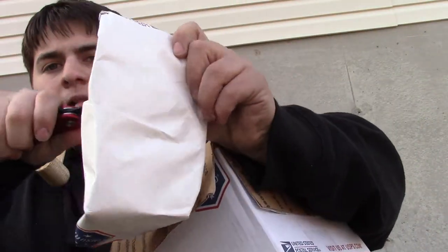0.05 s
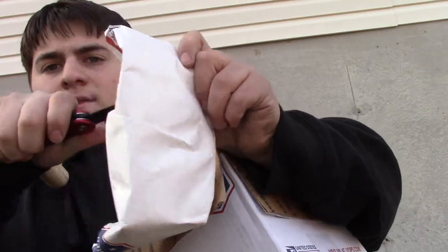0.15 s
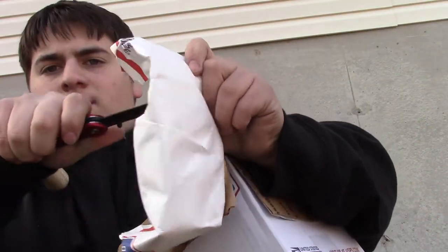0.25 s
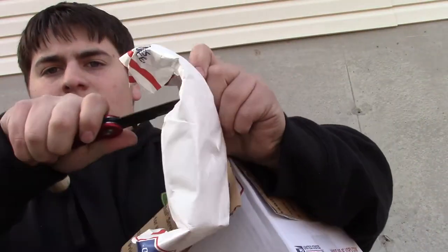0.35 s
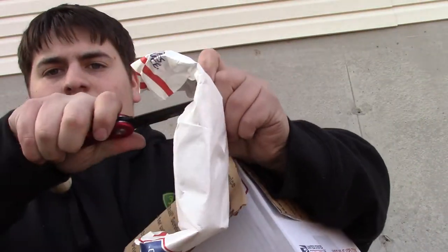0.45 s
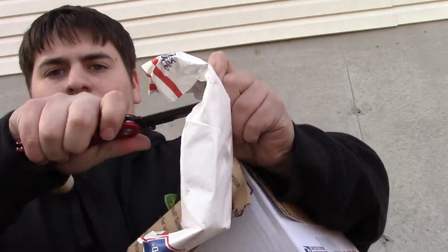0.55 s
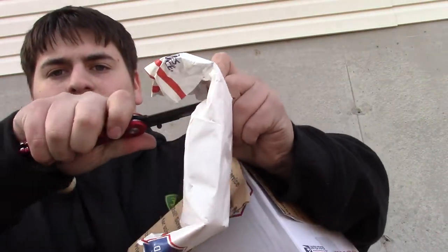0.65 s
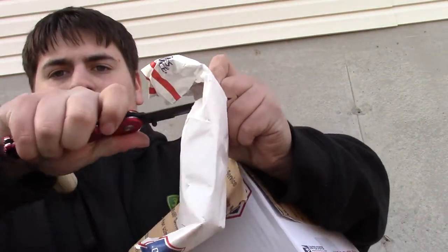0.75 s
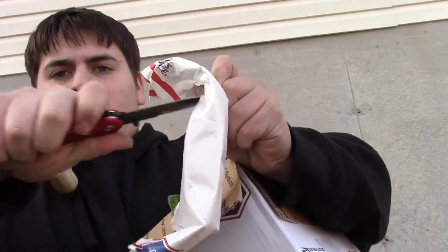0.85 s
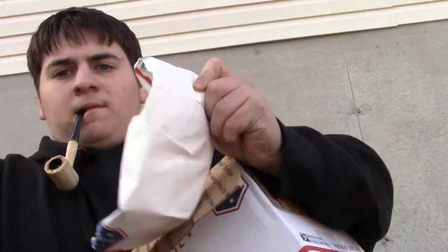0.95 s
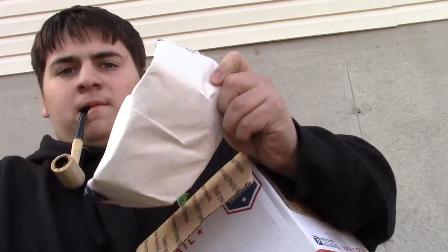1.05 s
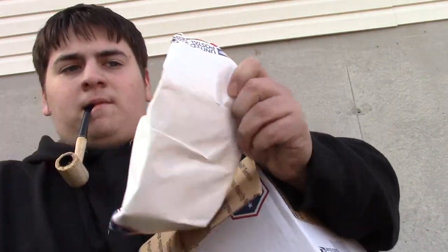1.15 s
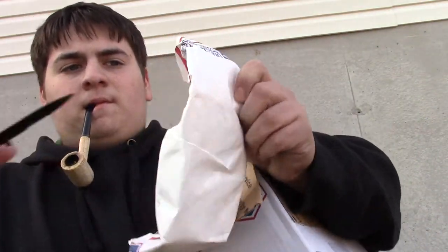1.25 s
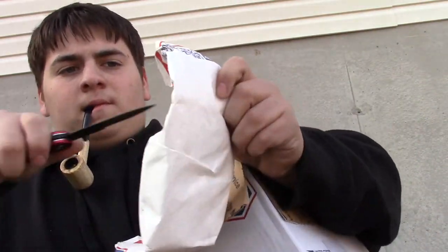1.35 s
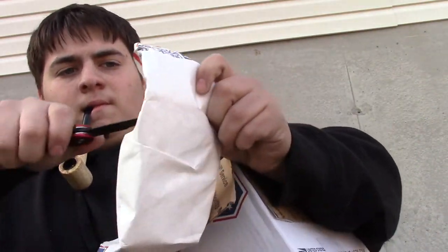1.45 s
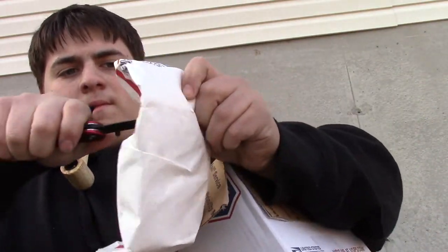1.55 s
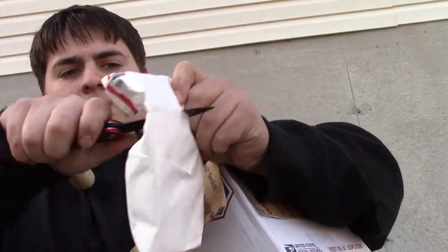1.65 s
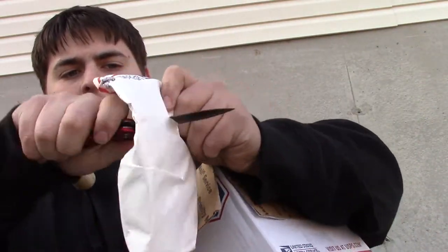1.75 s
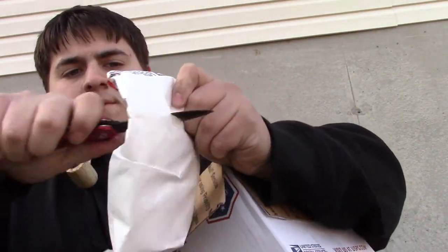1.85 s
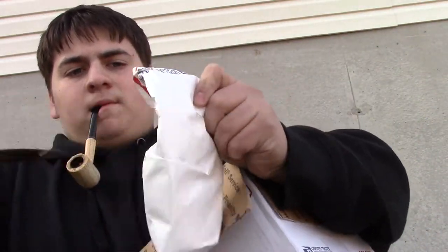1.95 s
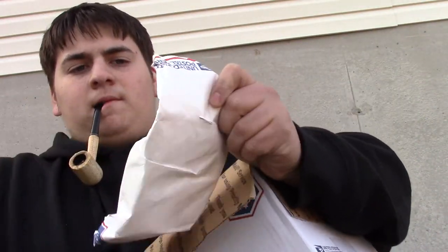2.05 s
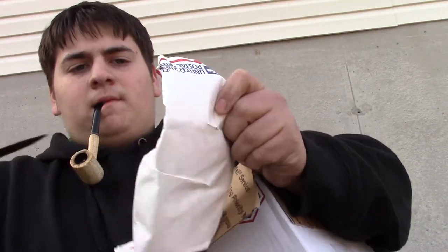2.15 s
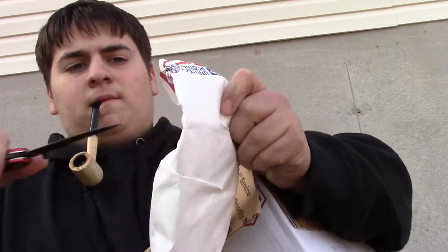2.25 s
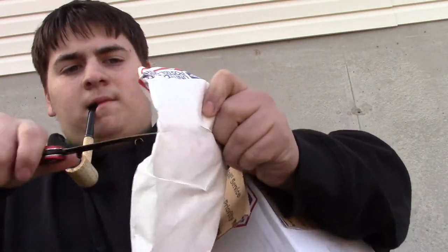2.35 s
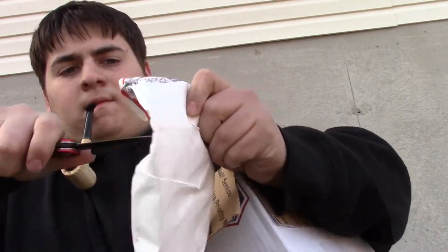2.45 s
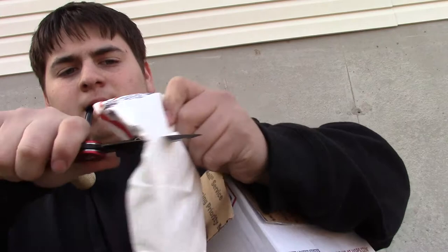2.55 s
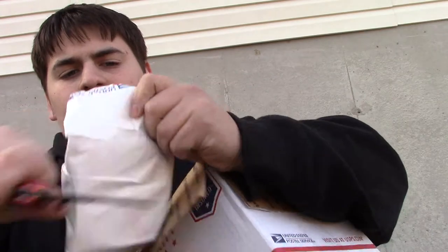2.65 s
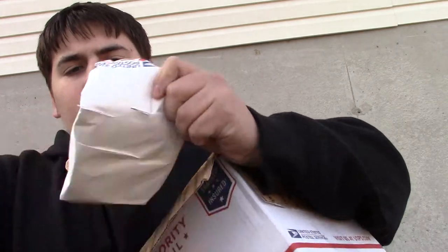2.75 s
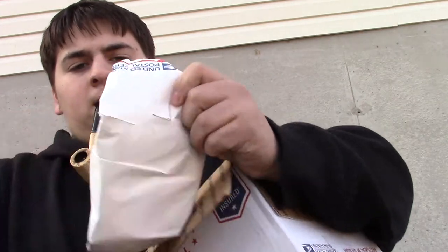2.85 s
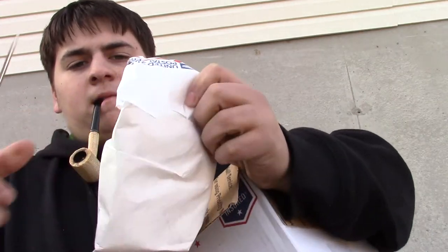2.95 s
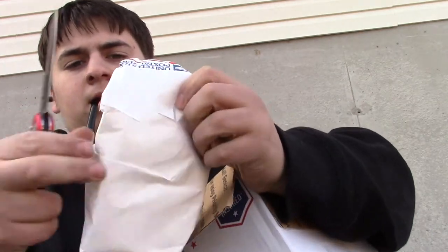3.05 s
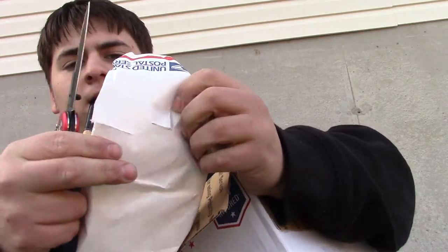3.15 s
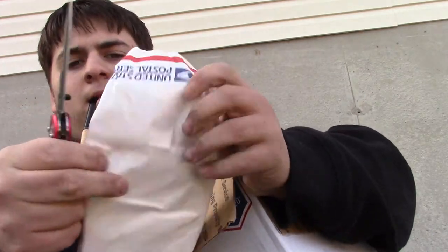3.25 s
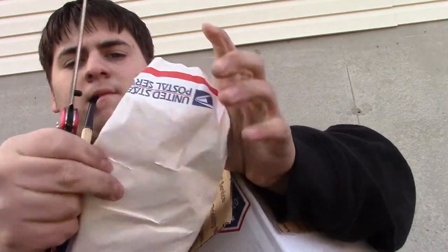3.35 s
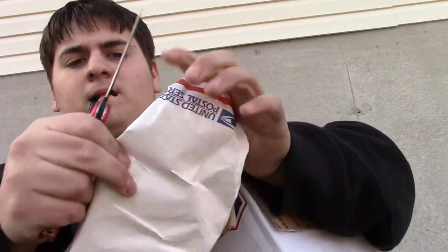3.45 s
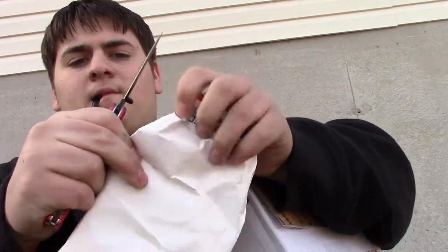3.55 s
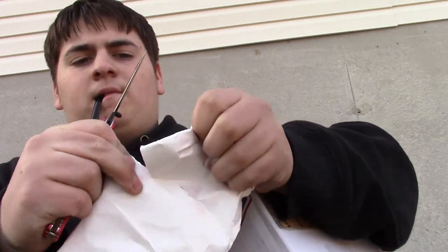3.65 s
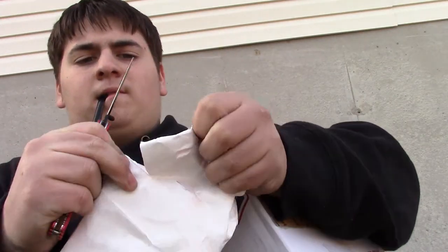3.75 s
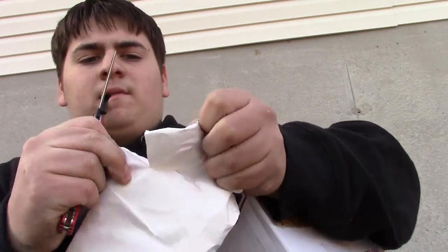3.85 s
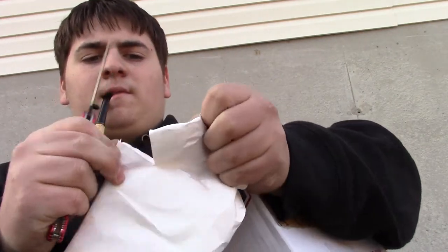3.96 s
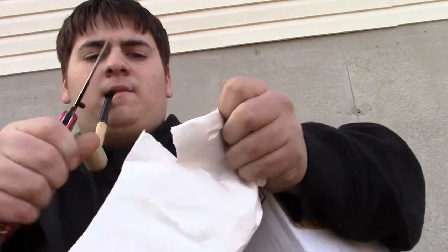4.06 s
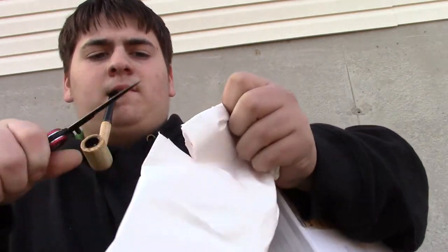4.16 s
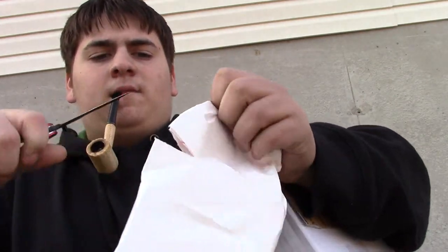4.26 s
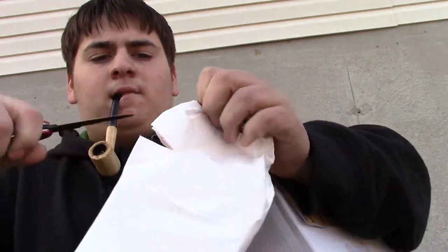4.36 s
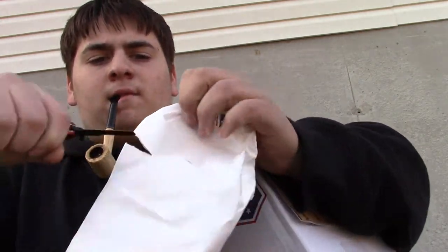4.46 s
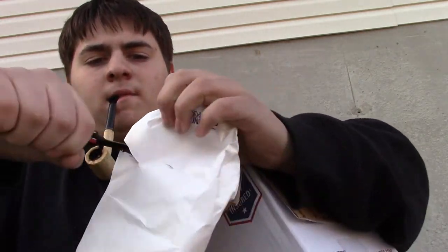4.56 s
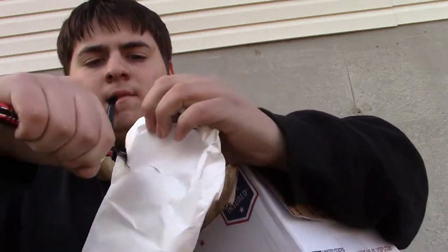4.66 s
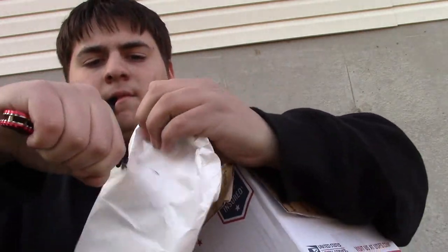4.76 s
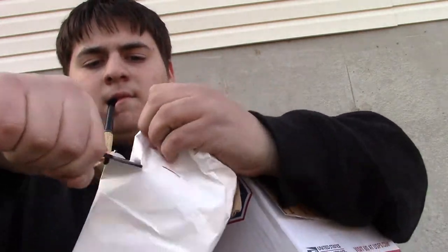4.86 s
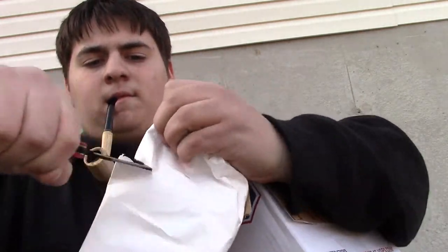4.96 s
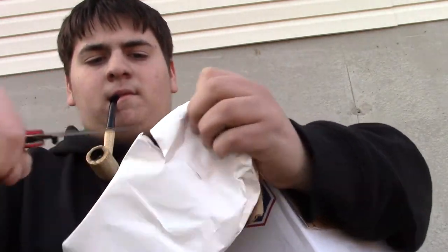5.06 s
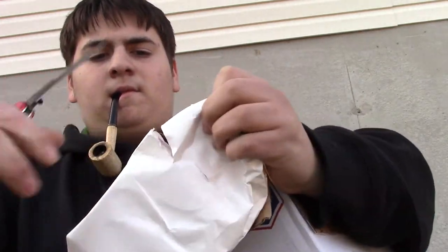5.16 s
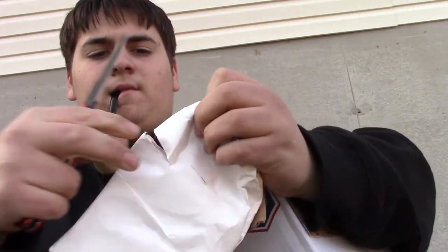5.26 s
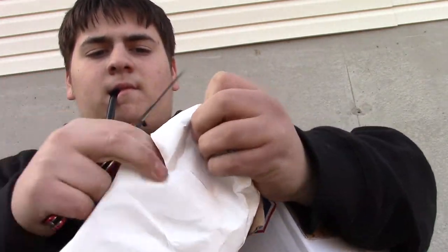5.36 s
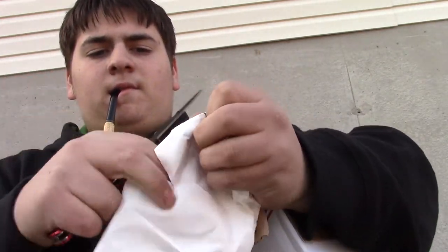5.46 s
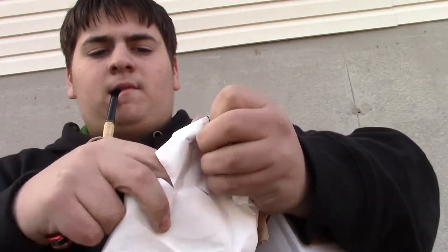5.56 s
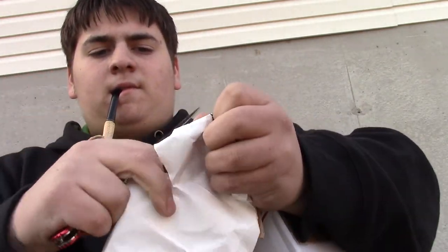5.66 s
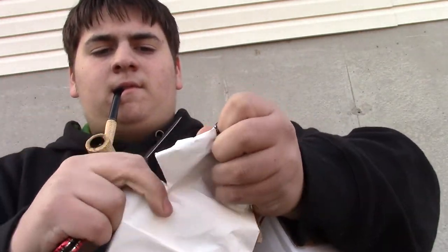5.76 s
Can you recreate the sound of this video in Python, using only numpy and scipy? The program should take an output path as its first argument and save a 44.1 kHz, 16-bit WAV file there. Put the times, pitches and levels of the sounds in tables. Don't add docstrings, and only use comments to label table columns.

```python
import sys
import numpy as np
from scipy import signal
from scipy.io import wavfile
from scipy.ndimage import uniform_filter1d

SR = 44100
rng = np.random.default_rng(int(sys.argv[2]) if len(sys.argv) > 2 else 0)


def bounce(signal):
    frames = np.transpose(np.atleast_2d(signal))
    limited = np.clip(frames, -1, 1)
    pcm = np.round(limited * 32767).astype(np.int16)
    wavfile.write(sys.argv[1], SR, pcm)


def how_loud(loudness_db):
    steps = np.asarray(loudness_db, float) / 20
    return 10 ** steps


N = 256662

# frequency in Hz, level in dB per Hz.
PAPER_SPECTRUM = [(88, -34.5), (150, -2.5), (172, -15), (205, -9), (401, 0.5), (845, 0.5), (1090, -0.5),
                  (2640, -1.5), (4200, -3), (5900, -4.5), (7480, 2.5), (12000, -4), (15200, -14),
                  (16400, -35)]


def rustle(cracks_per_s=6000, spread_db=3.0, clump_db=1.2, pops_db=-11.0, patchy_db=2.2, stir_db=4.0):
    flex_db, crackle_db, fizz_db, crumple = hands()
    crumple = np.clip(crumple, 0, 1)

    size = how_loud(spread_db * np.minimum(rng.exponential(1, N), 3.5)) * rng.choice([-1., 1.], N)
    cracks = evened(size * (rng.random(N) < cracks_per_s / SR))
    cracks = cracks + how_loud(pops_db) * pops(per_s=260, spread_db=2.5)
    slide = rng.standard_normal(N)
    drive = np.sqrt(1 - 0.66 * crumple) * slide + np.sqrt(crumple) * cracks

    drive *= how_loud(crumple * (clump_db * wander(73.0) + stir_db * stir()))
    drive /= np.sqrt(uniform_filter1d(drive ** 2, size=3500) + 1e-9)
    paper = signal.oaconvolve(drive, causal(PAPER_SPECTRUM))[:N]
    flex, crackle, fizz = split(mottled(paper, patchy_db))
    return how_loud(flex_db) * flex + how_loud(crackle_db) * crackle + how_loud(fizz_db) * fizz


# start in seconds, length in seconds, crackle level at the start in dB,
# growth to the end in dB, brightness (fizz re crackle) in dB. First, the blade slitting the sheet.
CUT_STROKES = [
    (0.876, 0.067, -41, 24.5, -1),
    (1.665, 0.11, -22.5, -0.5, 0),
    (1.857, 0.0637, -38, 12, -2),
    (1.928, 0.047, -26, -3.5, 1.5),
    (1.977, 0.016, -29, 16, -6),
    (3.112, 0.096, -38, 3, -3.5),
    (3.407, 0.152, -45, 18, 2),
    (4.706, 0.063, -40.5, 18, -5.5),
    (4.841, 0.29, -27, -6.5, -4),
]
RUB_STROKES = [(0, 0.1, -44, 3.5, -6.5), (.775, 0.107, -43.5, 0, 0.5), (0.963, 0.038, -29, -5.5, -1),
               (1.1, 0.11, -54.5, 13.5, -4.5), (1.188, .14, -41, 1, -0.5), (1.559, 0.097, -42, 2, -8),
               (2.004, 0.068, -36, -2.5, -2), (2.211, 0.07, -39, -3, -1), (2.6, 0.032, -17, 1, 4),
               (2.636, 0.027, -22, 3.5, -2.5), (2.923, 0.1, -36, -4, 0.5), (3.287, 0.095, -36, 2, -3),
               (4.074, 0.17, -42, -1, -25), (4.22, 0.13, -40.5, -10, -9.5), (4.37, 0.17, -58.5, 7, -3),
               (5.1, 0.08, -36, -11, -9)]
CRUSH_STROKES = [(.49, 0.072, -63.5, 16.5, 1.5), (1.04, 0.054, -47, -10, -25), (1.788, .07, -35, -5, -1.5),
                 (2.459, 0.062, -42, 11, -5.5), (2.678, 0.095, -23.5, -20, -9), (2.83, 0.11, -62, 16.5, -3),
                 (3.222, 0.07, -47, 5, -7), (3.559, 0.11, -22.5, -6, -7), (3.64, 0.055, -21.5, -2, -11.5),
                 (3.735, 0.11, -45, 17, -5.5), (3.867, 0.066, -29, -6, -10), (3.965, 0.084, -53, 16.5, -2),
                 (4.676, 0.0148, -45.5, 9.5, -4.5), (4.775, 0.019, -30, -4, -10), (4.812, 0.03, -37, 5, -8),
                 (5.349, 0.0407, -39.5, 10, -5.5), (5.393, 0.17, -30.5, -10, -7.5),
                 (5.512, 0.04, -42, 17.5, -3), (5.569, 0.088, -35.5, -4, -6), (5.649, 0.11, -28.5, -7, -8),
                 (5.758, 0.065, -28.5, -5, -9.5)]
PIERCE_STROKES = [
    (0.379, 0.056, -32, 11.5, -3),
    (.7, 0.016, -33, 12, 5),
    (.724, .02, -29.5, 5, -8),
    (2.552, 0.024, -35.5, 15, -11),
    (2.584, 0.009, -17.5, -3.5, -0.5),
]
# crumple share from 0 (slide) to 1, release in dB per second, flex re crackle in dB.
STROKE_KINDS = [
    (0.53, 1504, -7.5),
    (0.41, 445, -6),
    (0.98, 502, -4),
    (1, 517, -15),
]
# levels of flex, crackle and fizz in dB.
REST_LEVELS_DB = (-48.5, -71, -64)


def hands(attack_db_per_s=4996, flex_per_bright=-0.25, flex_late_db=4.5):
    t = np.arange(0, N / SR + .002, .001)
    power = how_loud(2 * np.array(REST_LEVELS_DB))[:, None] * np.ones(len(t))
    crumpled_power = .5 * how_loud(2 * REST_LEVELS_DB[1])
    kinds = (CUT_STROKES, RUB_STROKES, CRUSH_STROKES, PIERCE_STROKES)
    for strokes, (crumple, release_db_per_s, flex_db) in zip(kinds, STROKE_KINDS):
        start, length, db, growth_db, bright_db = np.transpose(strokes)[:, :, None]
        done = np.clip((t - start) / length, 0, 1)
        before_s = np.maximum(start - t, 0)
        after_s = np.maximum(t - start - length, 0)
        crackle_db = db + growth_db * done - attack_db_per_s * before_s - release_db_per_s * after_s
        sheet_db = flex_db + flex_per_bright * bright_db + flex_late_db * (done - .5)
        levels_db = np.array([crackle_db + sheet_db, crackle_db, crackle_db + bright_db])
        parts = how_loud(2 * levels_db).sum(1)
        power = power + parts
        crumpled_power = crumpled_power + crumple * parts[1]
    curves = (*10 * np.log10(power), crumpled_power / power[1])
    return [np.interp(np.arange(N) / SR, t, curve) for curve in curves]


def stir(after_s=.006):
    s, db = np.transpose(CREASES)[:2]
    kicks = np.zeros(N)
    kicks[np.round(s * SR).astype(int)] = how_loud(db)
    shake = signal.lfilter([1], [1, -np.exp(-1 / (after_s * SR))], kicks)
    usual = abs(uniform_filter1d(shake, size=2500)) + 1e-4
    return np.tanh(shake / usual - 1)


def pops(per_s, spread_db, cycles=1.4):
    size = how_loud(spread_db * np.minimum(rng.exponential(1, N), 4)) * (rng.random(N) < per_s / SR)
    pitches = np.geomspace(800, 9000, num=12)
    panel = rng.integers(0, len(pitches), N)
    t, out = np.arange(400) / SR, np.zeros(N)
    for k, hz in enumerate(pitches):
        tone = np.exp(-t * hz / cycles) * np.sin(2 * np.pi * hz * t)
        click = .5 * np.exp(-t / 0.00099) * rng.standard_normal(len(t))
        out += signal.oaconvolve(size * (panel == k), evened(tone + click))[:N]
    return evened(out)


def mottled(x, patchy_db):
    z = signal.stft(x, nperseg=256)[2]
    patches = uniform_filter1d(rng.standard_normal(z.shape), size=7, axis=0)
    patches = uniform_filter1d(patches, size=5, axis=1)
    return signal.istft(z * how_loud(patchy_db * evened(patches)), nperseg=256)[1][:N]


# time in
# seconds, peak level in dB, panel ring in Hz, fizz re peak in dB.
CREASE_SNAPS = [(0.0596, -23, 4130, -12), (0.1124, -18.5, 4310, 6.5), (0.1577, -17, 1400, -24),
                (0.19, -15, 2550, -5.5), (0.1958, -23, 1290, -20), (0.235, -19.5, 2700, -16),
                (0.265, -38, 730, -8), (0.3067, -40, 1160, 1), (0.3154, -26, 1210, -21),
                (0.3206, -22, 1720, -11), (0.3337, -10.5, 1110, -22), (0.3564, -10.5, 3550, -4),
                (0.3797, -11, 970, 0.5), (0.3976, -15, 3140, -0.5), (0.4187, -16, 1850, 11),
                (0.4229, -11, 3060, 7), (0.4418, -7.5, 3820, 7.5), (0.454, -19, 2630, 9),
                (0.4854, -32, 2110, -15), (0.5069, -40, 1250, 5), (0.5238, -34, 730, 5),
                (0.53, -32.5, 2410, 2), (0.5484, -33, 860, 5.5), (0.552, -34.5, 952, 0),
                (0.5878, -20, 2330, 9.5), (0.5937, -37, 860, 10), (0.6475, -23, 1210, -13),
                (0.6505, -28, 1640, -14), (0.662, -34, 5170, 7), (0.6707, -30.5, 5170, 5),
                (0.676, -33, 5210, 11.5), (0.6813, -28, 5250, 13), (0.722, -19, 4570, 4),
                (0.7256, -23, 4950, 1), (0.7581, -15, 1750, -10), (0.7811, -29, 1810, 14),
                (0.7955, -35, 1460, 12), (0.7988, -30, 1500, 9), (0.8336, -31, 4910, 5),
                (0.8431, -27.5, 4130, 14), (0.8894, -25, 3400, 6), (0.917, -18, 3750, 16),
                (0.9215, -8, 3830, -10), (0.9239, -6, 3400, 14), (0.9342, -16, 1640, 1),
                (0.9378, -7, 1420, 7), (0.9433, 0, 2370, -2),
                (0.9625, -10, 2070, -16), (0.9673, -22, 4310, -9), (0.9895, -23, 3620, 13.5),
                      (1.0293, -8.5, 746, -7.5), (1.0357, -17.5, 1590, -22), (1.046, -15, 1360, -17),
                      (1.071, -37.5, 730, 7), (1.185, -18.5, 730, -4.5), (1.263, -20, 1510, 3),
                      (1.3171, -18, 2780, -12), (1.4854, -46, 1030, 0), (1.6089, -18.5, 4220, -2),
                      (1.6448, -32, 1510, 3.5), (1.6477, -26, 4650, 6), (1.661, -9, 4300, -2),
                      (1.667, -10, 4820, -3), (1.6681, -2.5, 3720, -1.5), (1.6776, -15, 1890, -2),
                      (1.6843, -9.5, 4690, 8), (1.7559, -9, 730, -10), (1.8493, -22.5, 1590, 5),
                      (1.8723, -10.5, 3270, -17), (1.8883, -19, 3570, -4.5), (1.8935, -8, 2630, 2.5),
                      (1.9212, -18, 2450, 9), (1.9892, -6.5, 900, 2.5), (1.9945, -14, 2800, -3),
                      (1.9976, -2, 3570, -1), (2.0134, -13.5, 2150, 3), (2.0884, -20.5, 730, 4.5),
                      (2.092, -18, 2760, -9), (2.1108, -23, 2670, -22), (2.1246, -38, 820, 1),
                      (2.1315, -26, 820, -15), (2.1621, -45, 730, 0), (2.1987, -33, 1120, -1),
                      (2.214, -40, 1640, 13), (2.233, -28, 730, 3), (2.4188, -50, 1080, -1),
                      (2.4574, -15.5, 820, -16), (2.46, -27, 4820, -4), (2.465, -34.5, 5250, 10),
                      (2.4952, -14, 1720, -13.5), (2.5164, -17, 2540, 3.5), (2.542, -14, 1890, -2),
                      (2.5652, -19, 2840, 1), (2.5835, -11, 3960, -5),
                (2.5868, -11, 3750, -3), (2.65, -4, 4480, -3), (2.656, 1, 1850, -4),
                   (2.6638, -2.5, 900, 4), (2.6715, -2, 3920, -3), (2.6839, -9.5, 2500, 7),
                   (2.6947, -2.5, 2730, -6), (2.7123, -15, 780, -5), (2.716, -15, 870, -0.5),
                   (2.7726, -22, 1450, -14), (2.7844, -36, 730, -10), (2.8381, -43, 730, 1),
                   (2.8895, -29, 2370, -9), (2.9286, -12, 784, -13), (3.11, -21.5, 2200, -14),
                   (3.1746, -20.5, 2280, -10), (3.2164, -17.5, 1770, -2.5), (3.2407, -22, 2070, -22),
                   (3.2832, -30, 2020, -10.5), (3.3236, -16.5, 2670, 2), (3.332, -26, 2840, -0.5),
                   (3.334, -24, 2580, -4), (3.3626, -27, 2410, 14), (3.37, -20, 2410, -9),
                   (3.3788, -8, 4740, 2), (3.3824, -14, 2890, 7), (3.3886, -27, 4820, 6),
                   (3.4048, -8, 1660, 1.5), (3.5227, -18, 3100, -6), (3.541, -10.5, 1030, -6),
                   (3.5589, -13, 1590, 3), (3.5707, -2, 830, -7.5), (3.5737, -1.5, 1660, -15),
                   (3.59, -9, 2930, 4), (3.6002, -4.5, 4950, -11), (3.611, -6, 2580, -11),
                   (3.6226, -9, 2710, 3), (3.6254, -11, 2710, -6), (3.6285, -9, 2630, -11),
                   (3.6333, -9, 3920, -2), (3.641, -15, 3570, -3), (3.6446, -3.5, 3320, 0.5),
                   (3.6786, -3, 2450, -5), (3.6807, -4.5, 3360, -6), (3.6875, -9.5, 1340, -18),
                   (3.69, -8, 3660, -8), (3.695, -7, 2110, -7),
                (3.7125, -2, 2090, -9), (3.722, -11.5, 1550, -13), (3.7415, -25, 820, -8),
                     (3.752, -28, 3660, 0), (3.7556, -7.5, 3010, -24), (3.759, -2.5, 2970, -1),
                     (3.776, -19, 1160, 1), (3.7885, -21, 2800, -2), (3.7976, -6.5, 780, 1),
                     (3.8092, -26, 780, 5), (3.8227, -8.5, 820, 5), (3.8316, -10, 1550, -22.5),
                     (3.851, -12, 1120, 5), (3.86, -4, 2800, 2.5), (3.8683, -12, 4910, -2),
                     (3.8735, -5.5, 1150, -11), (3.8961, -6.5, 875, 9.5), (3.906, -17, 730, 4),
                     (3.9119, -29, 990, 9), (3.9323, -19, 4950, 7), (3.9483, -20, 730, -7),
                     (3.9773, -21, 730, -14), (3.9972, -15, 3880, -10), (4.012, -21, 1460, -9.5),
                     (4.0371, -22, 3450, -7), (4.0433, -23, 730, -5.5), (4.0922, -26, 2200, -8),
                     (4.1139, -16.5, 3620, 9), (4.1616, -22, 950, -14.5), (4.258, -18, 1720, -8),
                     (4.288, -27, 1510, -4), (4.2952, -22.5, 1120, -4), (4.3135, -25, 1810, -6.5),
                     (4.3831, -33, 730, -2), (4.3954, -31.5, 1640, 2), (4.43, -39, 730, 4),
                     (4.6564, -49, 730, 9), (4.6753, -35, 730, 0), (4.6878, -23.5, 2710, 2),
                     (4.6943, -25, 1420, -6), (4.702, -20, 4180, -7), (4.7216, -26, 820, 0),
                     (4.744, -16, 2150, -7), (4.7546, -11, 1890, 7.5), (4.7796, -7, 1370, -11),
                     (4.7969, -14, 1220, -13.5), (4.8203, -16, 1290, -11.5),
                (4.8418, -10, 820, 5.5), (4.8538, -5, 2240, -5), (4.8644, -3, 2760, -5),
                   (4.8687, -12, 5000, 4), (4.875, -16, 3530, -2), (4.88, -14, 4260, -1),
                   (4.918, -5, 1750, -16.5), (4.9215, -5, 2580, -0.5), (4.9516, -11, 2580, 0),
                   (4.9663, -10, 2760, 8), (4.977, -20, 3700, 6), (5.059, -12, 2630, 4.5),
                   (5.0676, -19, 730, 6), (5.0777, -9, 1460, -2), (5.103, -21, 2020, 2),
                   (5.1185, -32, 1980, -1), (5.1722, -13.5, 2670, -6), (5.239, -31.5, 730, -2),
                   (5.2551, -20.5, 2500, -12), (5.3288, -12.5, 1850, -13), (5.3497, -28, 1750, -1.5),
                   (5.3601, -16, 1810, -1), (5.365, -19.5, 1940, -4.5), (5.3846, -24, 950, -10),
                   (5.3964, -20, 2500, 4), (5.402, -20, 1250, -9), (5.4191, -13.5, 1980, -11),
                   (5.4486, -11, 730, -10), (5.4939, -22, 1420, -10), (5.5163, -14.5, 1770, -4),
                   (5.5358, -4.5, 3750, 2.5), (5.5501, -10.5, 1890, -9), (5.554, -1.5, 3880, 1),
                   (5.5665, -14, 1890, -11), (5.6026, -19, 955, -7), (5.614, -11.5, 2450, -1),
                   (5.6366, -12, 3660, 0), (5.6522, -8.5, 786, -10), (5.6656, -17, 2540, -15),
                   (5.6944, -14, 2150, -11), (5.7073, -9.5, 3160, -8), (5.7458, -18, 3060, -2),
                   (5.7616, -15.5, 1680, 5), (5.7651, -13, 1810, -3), (5.781, -9, 2070, 1),
                   (5.7934, -14, 2970, -3), (5.8063, -20, 730, 4)]
CREASES = CREASE_SNAPS


def snaps(ring_db=-12.5, ring_per_db=2.0, trim_db=(-2.5, -1.5, -1.5)):
    flip_s, settle_db, settle_t60_s, jolt_db = .0016, -22, .03, 7
    s, db, hz, fizz_db = np.transpose(CREASES)
    flex_db = -12.5 - 8.5 * np.log2(hz / 1460)
    out, t = np.zeros(N), np.arange(900) / SR

    noise = rng.standard_normal((len(s), len(t)))
    noise[:, 4] = how_loud(jolt_db) * np.sign(noise[:, 4])
    flip = np.exp(-(t / flip_s) ** 2)
    settling = how_loud(settle_db - 60 * t / settle_t60_s)
    bursts = noise * (flip + settling)
    paper = signal.oaconvolve(bursts, causal(PAPER_SPECTRUM)[None], axes=1)[:, :len(t)]

    flex, crackle, fizz = split(paper)
    fizz = signal.lfilter([1, 1.6, .7], 1, fizz) * np.exp(-t / .003)
    crackle = signal.sosfilt(signal.butter(4, 5800, fs=SR, output="sos"), crackle)
    panel = np.array([ring(part, f, f / 1.6) for part, f in zip(crackle, hz)])
    panel_db = np.minimum(ring_db - ring_per_db * fizz_db, 2.5)
    crackle = peaked(crackle) + how_loud(panel_db)[:, None] * peaked(panel)

    parts, levels_db = (flex, crackle, fizz), (db + flex_db, db, db + fizz_db)
    for part, part_db, trim in zip(parts, levels_db, trim_db):
        for at, sound in zip(s, how_loud(part_db + trim)[:, None] * peaked(part)):
            add(out, at, sound)
    return out


# start in seconds, peak level in dB, pitch in Hz, 60 dB decay in seconds.
BAG_THUMPS = [(0.643, -19.5, 430, 0.037), (0.938, -11, 500, 0.027), (1.185, -18, 630, 0.0315),
              (1.991, -4.5, 776, 0.019), (5.651, -24, 217, 0.043), (5.653, -6.5, 864, 0.012),
              (1.752, -9, 660, 0.024), (2.673, -17, 216, 0.039), (5.078, -14, 337, 0.026),
              (1.988, -13.5, 332, 0.091), (2.647, -24, 380, 0.042), (2.215, -26, 257, 0.045),
              (2.752, -21, 216, 0.071), (3.572, -9.5, 222, 0.024), (3.646, -18, 264, 0.06),
              (3.662, -11, 390, 0.037), (3.79, -19, 334, 0.037), (4.916, -20, 430, 0.041),
              (5.545, -21, 436, 0.053)]


def thumps(rise_s=0.0011):
    out, t = np.zeros(N), np.arange(6000) / SR
    for s, db, hz, t60 in BAG_THUMPS:
        envelope = how_loud(db - 60 * t / max(t60, .01)) * (1 - np.exp(-t / rise_s))
        add(out, s, envelope * np.sin(2 * np.pi * hz * t))
    return out


def yard(x, t60=0.007, tail_db=-18, apart_db=-20):
    t = np.arange(8000) / SR
    mid, side = rng.standard_normal((2, len(t))) * how_loud(-60 * t / t60) * (t > .003)
    side = how_loud(apart_db) * side
    tail = np.array([mid + side, mid - side]) * how_loud(tail_db) / np.linalg.norm(mid)
    return x + signal.fftconvolve(x[None], tail, axes=1)[:, :N]


# frequency in Hz, side re mid in dB.
PORT_SIDE = [(500, -49), (2500, -37.5), (6000, -25.5), (10000, -26), (15000, -22)]


def ports(x):
    side = signal.oaconvolve(x.mean(0), causal(PORT_SIDE))[:N]
    delayed = np.roll(side, 3)
    return x + np.array([delayed, -delayed])


# frequency in Hz, level in dB per Hz.
TRAFFIC_SPECTRUM = [(15, -42), (25, 3.5), (167, -4), (582, -2), (1240, -15.5), (1630, -8.5), (1820, -15),
                    (1970, -17), (2890, -19.5), (7670, -31.5), (12200, -49), (15100, -42), (16400, -42)]
# frequency in Hz, side re mid in dB.
TRAFFIC_SIDE = [(60, -14.5), (800, -17), (2400, -16.5), (15000, -6)]


def traffic(level_db=-44, patchy_db=-2.5):
    frames, hz = N // 256 + 5, np.fft.rfftfreq(1024, 1 / SR)
    a, b, c, d, patches = rng.standard_normal((frames, 513, 5)).T
    patches = uniform_filter1d(patches, size=12, axis=0)
    patches = evened(uniform_filter1d(patches, size=14, axis=1))
    mid = a + 1j * b
    side = (c + 1j * d) * how_loud(read(TRAFFIC_SIDE, hz))[:, None]
    colour = how_loud(read(TRAFFIC_SPECTRUM, hz)[:, None] + patchy_db * patches)
    z = np.array([mid + side, mid - side]) * colour
    return how_loud(level_db) * evened(signal.istft(z, nperseg=1024, noverlap=768)[1][:, :N])


# frequency in Hz, rms level in dB, line width in Hz.
MOTOR_LINES = [(91.7, -55.5, 5), (180, -51, 5.8), (307, -51, 12), (454, -55.5, 40)]


def motor(steady=0.31):
    t, out = np.arange(N) / SR, np.zeros(N)
    for hz, db, width_hz in MOTOR_LINES:
        tone = np.sqrt(2) * np.sin(2 * np.pi * hz * t + wander(1.5))
        fuzz = evened(ring(rng.standard_normal(N), hz, width_hz))
        out += how_loud(db) * evened(steady * tone + (1 - steady) * fuzz)
    return out


def ring(x, hz, width_hz):
    r = np.exp(-np.pi * width_hz / SR)
    return signal.lfilter([1 - r], [1, -2 * r * np.cos(2 * np.pi * hz / SR), r * r], x)


def wander(hz):
    return evened(signal.sosfilt(signal.butter(2, hz, fs=SR, output="sos"), rng.standard_normal(N)))


def causal(points):
    level_db = np.maximum(read(points, np.fft.rfftfreq(2048, 1 / SR)), -100)
    half = np.log(how_loud(level_db))
    full = np.r_[half, half[-2:0:-1]]
    return np.fft.ifft(np.exp(full - 1j * signal.hilbert(full).imag)).real[:1024]


CROSSOVERS_HZ = (1300, 5500)


def split(x):
    def twice(v, hz, kind):
        sos = signal.butter(2, hz, kind, fs=SR, output="sos")
        return signal.sosfilt(np.vstack([sos, sos]), v)

    low, high = CROSSOVERS_HZ
    upper = twice(x, low, "high")
    parts = (twice(x, low, "low"), twice(upper, high, "low"), twice(upper, high, "high"))
    return [evened(part) for part in parts]


def read(points, hz):
    f, value = np.transpose(points)
    return np.interp(np.log(hz + 1), np.log(f + 1), value)


def evened(x):
    return x / np.sqrt(np.mean(x ** 2) + 1e-20)


def peaked(rows):
    return rows / abs(rows).max(axis=1, keepdims=True)


def add(mix, s, sound):
    part = mix[round(s * SR):][:len(sound)]
    part += sound[:len(part)]


def scene():
    paper = rustle() + snaps() + thumps()
    return ports(yard(paper)) + traffic() + motor()


def low_pass(x):
    return signal.sosfilt(signal.butter(12, 16570, fs=SR, output="sos"), x)


def record(dry):
    mic_low_hz, edge_hz = 84.5, 15900
    cut = signal.sosfilt(signal.butter(4, mic_low_hz, "high", fs=SR, output="sos"), dry)
    clipped = np.clip(cut, -.95, .95)
    edge = signal.firwin(401, edge_hz, fs=SR)[None]
    mix = signal.oaconvolve(clipped, edge, "same")
    return low_pass(mix)


dry = scene()
out = record(dry)
bounce(out)
```